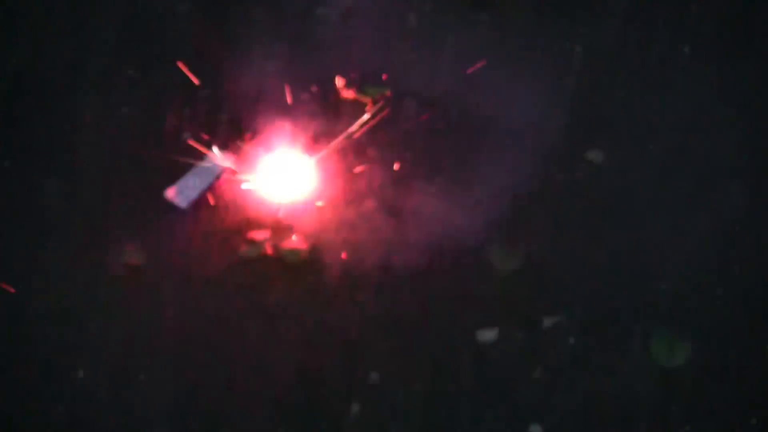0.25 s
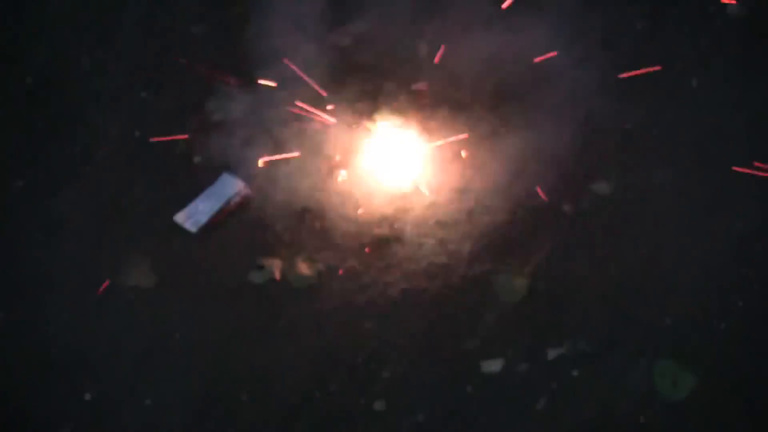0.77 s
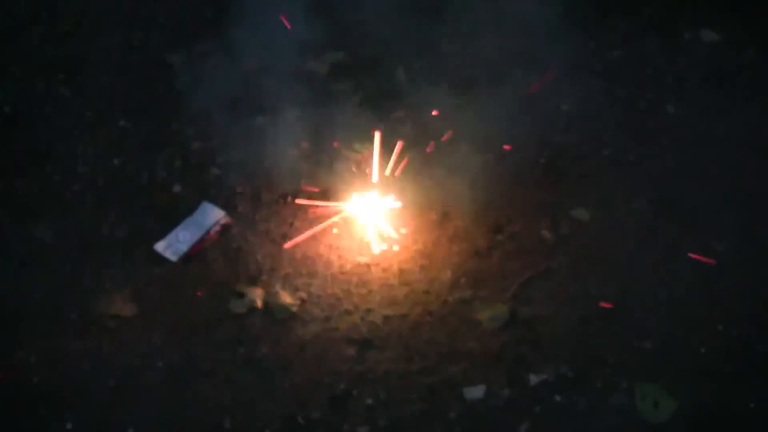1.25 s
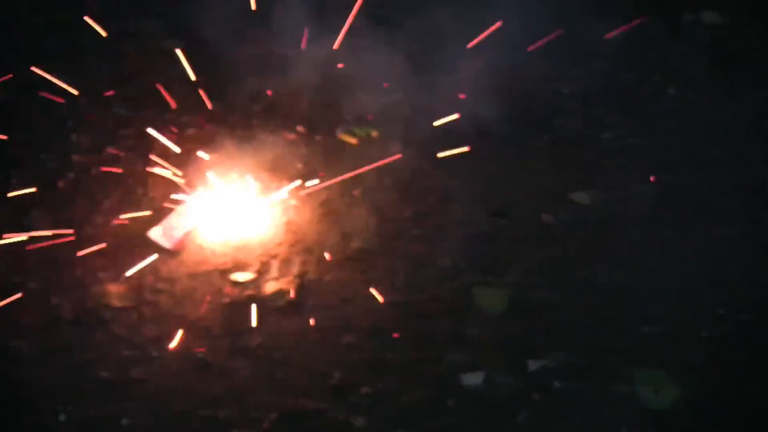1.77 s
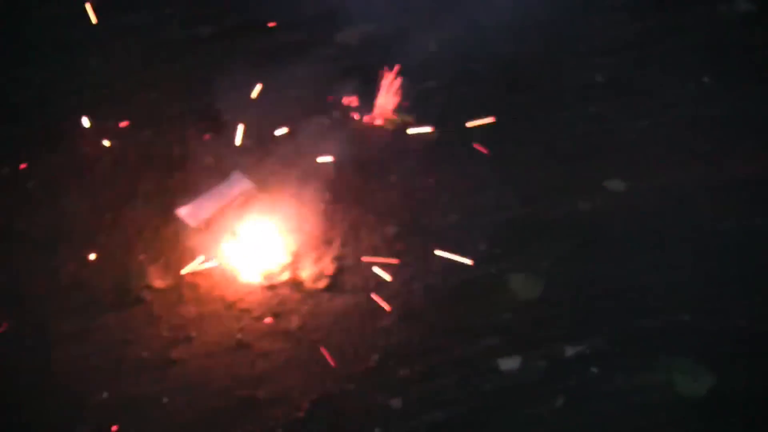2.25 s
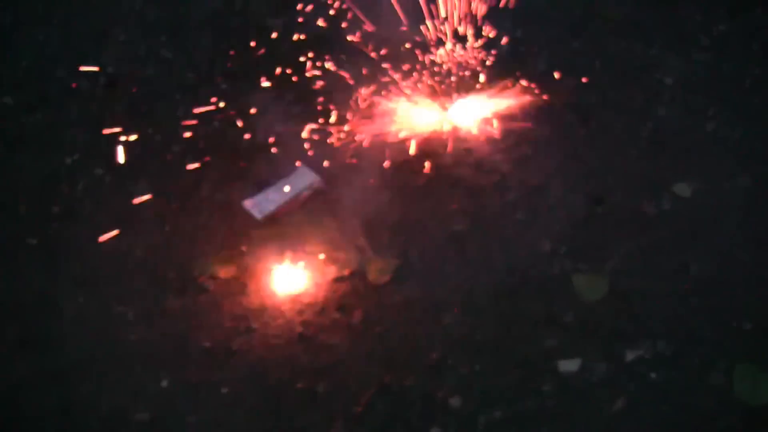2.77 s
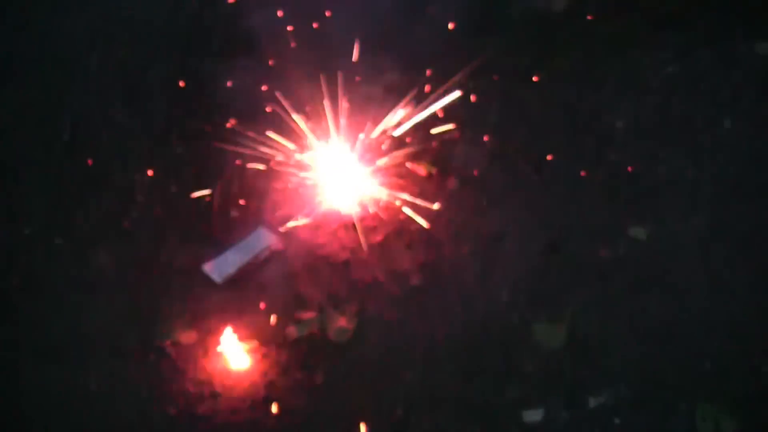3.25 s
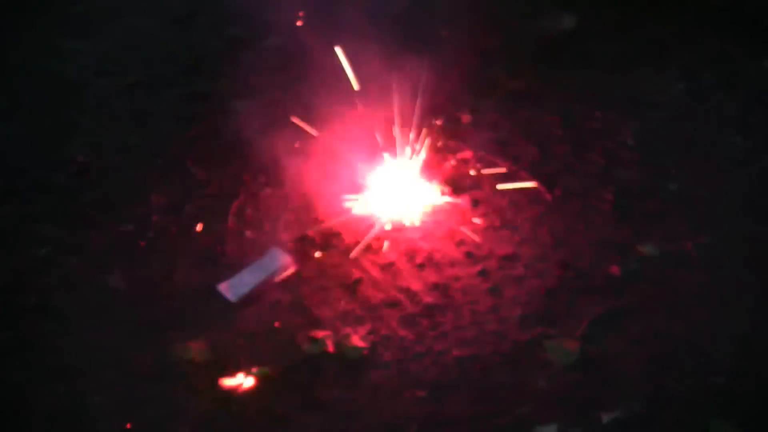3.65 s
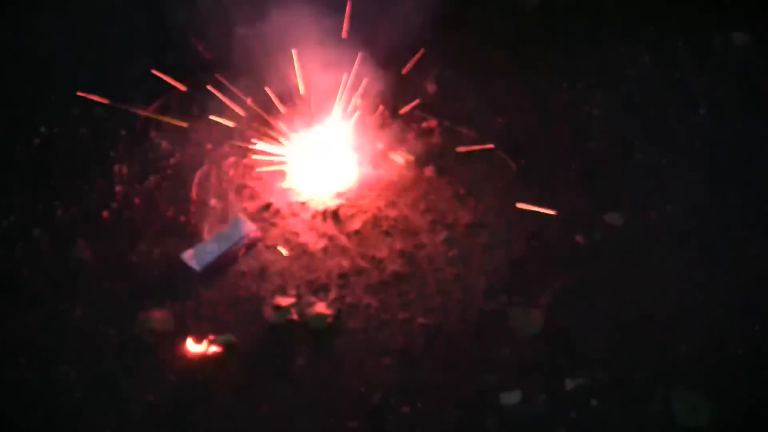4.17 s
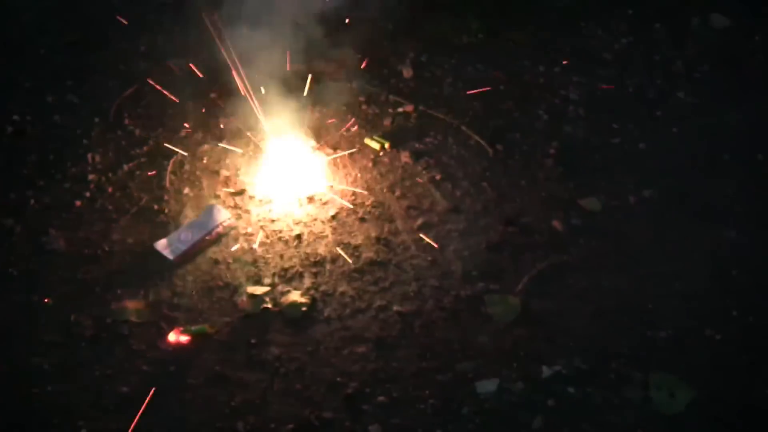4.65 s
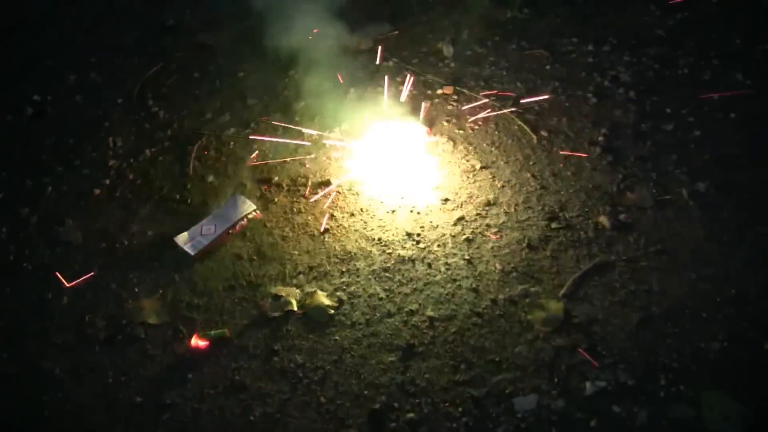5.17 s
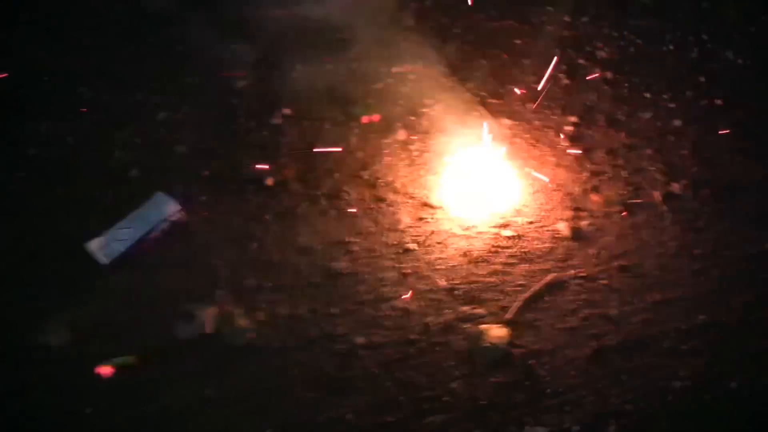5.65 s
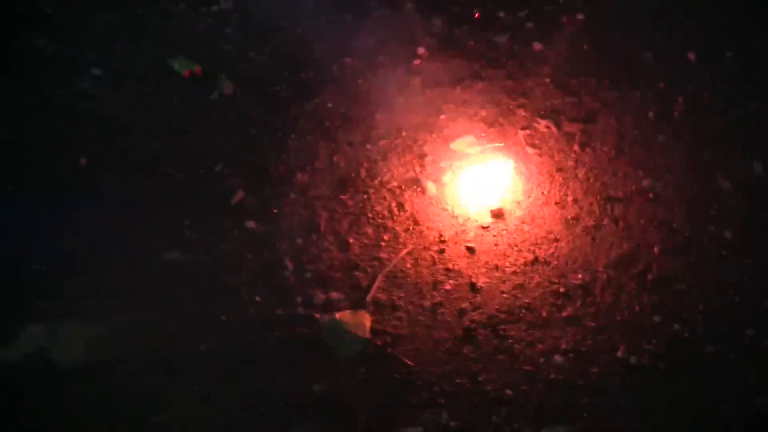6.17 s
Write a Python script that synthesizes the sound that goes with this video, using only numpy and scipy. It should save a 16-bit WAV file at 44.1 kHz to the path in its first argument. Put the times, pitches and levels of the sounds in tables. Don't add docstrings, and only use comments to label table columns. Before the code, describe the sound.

Two ground spinner fireworks burn in turn on gravel, a harsh crackling hiss and roar with buzzing hum, knocks and sharp pops.

```python
import sys
import numpy as np
from scipy import signal
from scipy.fft import rfft, irfft
from scipy.io import wavfile
from scipy.ndimage import uniform_filter1d

SR = 44100
rng = np.random.default_rng(int(sys.argv[2]) if len(sys.argv) > 2 else 0)


def field_ratio(decibels):
    return 10 ** (np.asarray(decibels, dtype=float) / 20)


def inscribe(sig):
    pcm = np.round(np.clip(np.atleast_2d(sig).T, -1, 1) * 32767)
    wavfile.write(sys.argv[1], SR, pcm.astype(np.int16))


N = 282813
T = np.arange(N) / SR
F = np.fft.rfftfreq(N, 1 / SR) + 1

TIRED_FROM_S, FIRST_END_S = 1.93, 2.82
# start_s, peak_db
TIRED_KNOCKS = [(1.959, -24), (1.97, -28), (1.985, -25), (1.998, -22), (2.012, -22), (2.027, -17),
                (2.04, -16), (2.055, -17), (2.073, -22), (2.094, -30), (2.113, -25), (2.13, -27),
                (2.139, -32), (2.147, -32), (2.166, -28), (2.182, -21), (2.2, -24), (2.214, -18),
                (2.231, -16), (2.247, -17), (2.266, -21), (2.291, -26), (2.312, -25), (2.333, -30),
                (2.355, -28), (2.375, -20), (2.393, -22), (2.412, -18), (2.434, -17), (2.455, -19),
                (2.465, -22), (2.471, -28), (2.483, -24), (2.489, -24), (2.5, -31), (2.508, -20),
                (2.516, -21), (2.532, -21), (2.54, -21), (2.561, -20), (2.582, -19), (2.596, -28),
                (2.605, -20), (2.614, -20), (2.629, -19), (2.651, -20), (2.66, -25), (2.669, -30),
                (2.676, -19), (2.684, -22), (2.696, -24), (2.713, -27), (2.719, -25), (2.728, -21),
                (2.75, -24), (2.767, -28)]
# start_s, peak_db
EARLY_KNOCKS = [(2.785, -25), (2.839, -21), (2.855, -24), (2.874, -20), (2.89, -21), (2.9, -20),
                (2.918, -20), (2.934, -23), (2.944, -24), (2.961, -23), (2.977, -22), (2.99, -25),
                (3.0, -21), (3.013, -21), (3.025, -22), (3.042, -24), (3.057, -21), (3.084, -21),
                (3.093, -26), (3.107, -27), (3.135, -22), (3.162, -23), (3.177, -22), (3.191, -22),
                (3.221, -25), (3.272, -23), (3.28, -26), (3.301, -25), (3.312, -27), (3.499, -23),
                (3.509, -27), (3.549, -27), (3.745, -26), (3.755, -23), (3.885, -26), (3.894, -24),
                (3.915, -26), (4.152, -22), (4.233, -25), (4.242, -24), (4.269, -25), (4.456, -23),
                (4.465, -20), (4.473, -22), (4.493, -26), (4.599, -22), (4.607, -25), (4.628, -23),
                (4.705, -23), (4.713, -24), (4.743, -23), (4.763, -24), (4.86, -23), (4.878, -21),
                (4.888, -26)]
# start_s, peak_db
SLOW_KNOCKS = [(4.899, -29), (4.907, -22), (4.938, -25), (4.948, -28), (4.967, -23), (4.977, -18),
               (4.99, -23), (4.998, -28), (5.062, -25), (5.095, -26), (5.117, -25), (5.14, -19),
               (5.357, -28), (5.566, -24), (5.612, -21), (5.626, -20), (5.642, -19), (5.66, -18),
               (5.679, -25), (5.717, -26), (5.736, -25), (5.754, -25), (5.809, -25), (5.848, -24),
               (5.901, -29), (5.916, -23), (5.958, -26), (6.023, -27), (6.033, -19), (6.055, -24),
               (6.064, -27), (6.075, -26), (6.083, -21), (6.095, -28), (6.102, -25), (6.112, -28),
               (6.137, -26), (6.172, -26), (6.179, -26), (6.192, -17), (6.199, -21), (6.216, -18),
               (6.227, -17), (6.247, -19), (6.256, -23), (6.269, -29), (6.29, -17), (6.313, -24),
               (6.331, -17), (6.339, -25), (6.345, -24), (6.354, -23), (6.366, -25), (6.383, -27),
               (6.392, -25), (6.401, -25)]


def columns(table):
    s, *rest = np.transpose(table)
    return [np.interp(T, s, c) for c in rest]


def unit(x):
    return x / np.sqrt(np.mean(x ** 2))


def walk(rate):
    hold = max(int(SR / rate), 1)
    steps = np.repeat(rng.standard_normal(N // hold + 1), hold)
    w = uniform_filter1d(uniform_filter1d(steps, hold), hold)[:N]
    return w / w.std()


def spans(starts, lengths, values, edge_s):
    out = sum(v * ((T >= s) & (T < s + d)) for s, d, v in zip(starts, lengths, values))
    return uniform_filter1d(out, max(int(edge_s * SR), 1))


def colour(table):
    hz, db = np.transpose(table)
    return field_ratio(np.interp(np.log(F), np.log(hz), db))


def flame(ground_db):
    # start_s, level_db, pressure, sparkle
    burn = [(0, -30, 1.03, 0.47), (.66, -26.5, 0.72, 0.24), (.7, -31.5, 1.1, 0.58), (1.23, -30, 0.87, 0.5),
            (1.36, -28, 1, 0.62), (1.9, -28.5, 0.5, 0.44), (2.66, -25, 0, 0.31), (2.8, -25.5, 0.5, 0.27),
            (3.1, -26.5, 0.27, -0.2), (3.25, -27.5, 0.66, 0.012), (3.52, -28, 0.89, -0.053),
            (3.68, -28, 1.16, 0.41), (4.4, -28.5, 0.92, 0.41), (5.2, -28, 0.43, 0.78),
            (5.5, -28.5, 0.56, 0.8), (5.9, -30, 0.04, 0.63), (6.1, -28.5, -0.8, 0.42),
            (6.41, -29.5, -3, 0.22)]
    # middle_s, length_s, change_db
    flares = [(0.14, 0.036, 2), (0.823, 0.12, -2.5), (1.283, 0.03, 3), (1.427, 0.037, 2.5),
              (1.496, 0.039, -1), (1.57, 0.058, 1.5), (1.929, 0.045, -1), (2.122, 0.057, 1.5),
              (2.74, 0.061, 1), (3.14, 0.028, 5), (3.772, 0.047, 2), (3.89, 0.057, 1), (4.473, 0.043, 0),
              (4.98, .03, 1), (5.007, 0.051, -3.5), (5.225, 0.12, 0.5), (5.124, 0.016, -6),
              (5.177, 0.028, 1.5), (5.438, 0.061, -2), (5.711, 0.025, 4), (6.081, 0.026, 4.5),
              (6.13, 0.047, -2), (6.227, 0.032, 2.5), (6.273, .03, -3), (6.335, 0.042, -6.5),
              (6.352, .015, -1)]
    # middle_s, length_s, change_db
    lulls = [(.45, .1, -2), (0.721, 0.091, -1), (0.948, 0.095, 2), (1.374, 0.1, -1), (1.71, .09, -1.5),
             (2.138, .05, -2), (2.33, .06, -2.5), (2.553, 0.35, -0.5), (2.78, 0.069, -1), (3.001, 0.36, 2),
             (3.638, 0.12, -1.5), (4.405, 0.1, -2), (4.6, 0.33, 0.5), (5.244, 0.16, -5.5),
             (5.42, 0.11, -3.5), (5.68, 0.23, 2.5), (5.994, .05, 1), (6.093, 0.16, 1.5), (6.27, 0.13, 0),
             (6.36, .04, -3)]
    level_db, pressure, sparkle = columns(burn)
    middle, length, db = np.transpose(flares)
    flare_db = spans(middle - length / 2, length, db, 0.03)
    middle, length, db = np.transpose(lulls)
    gravel_db = ground_db + spans(middle - length / 2, length, db, 0.063)
    hiss_db = level_db - 0.96 + 0.066 * pressure + 12.4 * sparkle + flare_db
    roar_db = level_db - 0.12 - 3.5 * pressure + 0.089 * sparkle + 0.25 * flare_db + gravel_db
    rush_db = level_db - 2.9 - 1.74 * pressure + 8.66 * sparkle + 0.25 * flare_db + 0.39 * gravel_db
    fizz_db = level_db + 0.089 + 5.97 * pressure + 0.1 * sparkle + 0.84 * flare_db
    return hiss_db, roar_db, rush_db, fizz_db


def gas(beat, spark_db, fast_db, slow_db):
    sizes_db = np.minimum(4.0 * rng.exponential(size=N), 13)
    struck = rng.random(N) < 1500 / SR
    sparks = struck * field_ratio(sizes_db) * np.sign(rng.standard_normal(N))
    noise = rng.standard_normal((2, N)) * field_ratio(fast_db * walk(220) + slow_db * walk(45))
    noise[0] += field_ratio(spark_db) * unit(sparks)
    return rfft(noise * beat)


def jets(beat, ground_db):
    # pitch_hz, level_db
    roar_points = [(30, -8), (60, -17), (94, -2.5), (126, -3.5), (232, -1.5), (389, -15), (513, -10.5),
                   (757, -10.5), (911, -16.5), (1140, -10.5), (2020, -3.5), (2170, -2), (2470, 0),
                   (5000, -3), (6500, -12), (11000, -120)]
    # pitch_hz, level_db
    hiss_points = [(1470, -23), (2500, -0.5), (3610, 1.5), (5380, 3.5), (6270, 3), (8070, -5.5),
                   (9200, -2.5), (10800, -1.5), (12400, -6.5), (14700, -5), (15600, -8.5)]
    crossings = (450, 1250, 4150, 8200, 11600)
    roar_tint, hiss_tint = colour(roar_points), colour(hiss_points)
    hiss_db, roar_db, rush_db, fizz_db = flame(ground_db)
    coarse = np.clip((roar_db - hiss_db + 10) / 12, 0, 1)
    roar = roar_tint * gas(beat ** (0.69 + 0.18 * coarse), spark_db=-5.5 + 2.4 * coarse,
                           fast_db=1.36 + 0.63 * coarse, slow_db=0.5)
    rush = roar_tint * gas(beat ** (1.0 + 0.2 * coarse), spark_db=-5 + 2.0 * coarse, fast_db=2.0, slow_db=0.7)
    rush = 0.57 * roar + rush
    beat = np.roll(beat, int(0.0023 * SR))
    hiss = hiss_tint * gas(beat ** 0.5, spark_db=-1.0, fast_db=1.77, slow_db=-0.15)
    fizz = 0.28 * hiss + hiss_tint * gas(beat ** 0.83, spark_db=-4, fast_db=2.3, slow_db=0.3)
    crest = 0.9 * fizz + hiss_tint * gas(beat ** 0.8, spark_db=-4, fast_db=2.2, slow_db=0.2)

    rumble_db = np.minimum(roar_db, -29.5) - 11.5
    levels = (rumble_db, roar_db - 3.5, rush_db - 0.8, hiss_db - 0.3, fizz_db - 2.5, fizz_db - 5.5)
    parts = (roar, roar, rush, hiss, fizz, crest)
    edges = (0, *crossings, SR)
    direct, diffuse = 0, 0
    for lo, hi, db, (near, around) in zip(edges, edges[1:], levels, parts):
        weight = 1 / np.sqrt((1 + (lo / F) ** 8) * (1 + (F / hi) ** 8))
        gain = field_ratio(db + 0.2 * walk(15) + 1.3 * walk(140))
        direct = direct + gain * unit(irfft(near * weight, N))
        if hi > crossings[2]:
            diffuse = diffuse + gain * unit(irfft(around * weight, N))
    return direct, diffuse


def first_motion():
    # start_s, turns_hz
    free_speed = [
        (0, 97.9),
        (.13, 129.7),
        (.5, 128.4),
        (1.0, 139.8),
        (1.45, 128.2),
        (1.63, 115),
        (1.8, 101.4),
        (1.95, 76),
        (2.3, 56.15),
        (2.85, 42),
    ]
    # start_s, length_s, thump_db, share of speed lost (0-1)
    scrapes = [(0, 0.15, -36.5, 0.08), (0.132, 0.064, -33.5, 0.25), (0.201, 0.05, -34.5, 0.07),
               (0.252, 0.12, -33.5, 0.25), (0.358, 0.047, -36, 0.43), (0.532, 0.074, -32, 0.3),
               (0.797, 0.068, -34, 0.41), (1.033, 0.075, -30.5, 0.41), (1.112, 0.085, -35.5, 0.31),
               (1.199, 0.055, -29.5, 0.37), (1.348, 0.076, -43.5, 0.01), (1.468, 0.06, -34, 0.42),
               (1.66, 0.12, -32.5, 0.26), (1.768, 0.11, -35.5, 0.25), (1.907, 0.11, -45, 0.09),
               (2.02, 0.073, -31.5, 0), (2.102, 0.093, -27, 0.06), (2.207, 0.06, -31.5, 0.1),
               (2.287, 0.087, -48, 0.01), (2.382, 0.088, -31.5, 0.1), (2.48, 0.19, -30, 0.12),
               (2.676, 0.13, -36, 0.14)]
    start, length, db, lost = np.transpose(scrapes)
    lag = np.exp(-1 / (0.035 * SR))
    drag = signal.lfilter([1 - lag], [1, -lag], spans(start, length, lost, 0))
    thump = spans(start, length, field_ratio(db), 0.032) + field_ratio(-69)
    contact = np.minimum(thump / field_ratio(-33.5), 1.2)
    return columns(free_speed)[0] * (1 - drag), 20 * np.log10(thump), contact


def turning(hz, wobble=0.006):
    return np.cumsum(hz * (1 + wobble * walk(40))) / SR


def thud(pulses, shift=1):
    # pitch_hz, width_hz, level_db
    modes = [
        (203, 286, 5),
        (557, 410, -3.5),
        (1450, 4500, -19),
        (95, 99, -5.5),
    ]
    push = signal.lfilter(*signal.butter(2, 1200, fs=SR), pulses)
    out = 0
    for i, (hz, width, db) in enumerate(modes):
        peak = signal.iirpeak(shift * hz, hz / width, SR)
        ring = signal.lfilter(*peak, push)
        if i == 0:
            ring = signal.lfilter(*peak, ring)
        out = out + field_ratio(db) * ring
    return out


def first_body(turns, hz, thump_db, alive):
    late = 0.013 * (100 / hz) ** 2 * walk(130)
    landed = np.maximum.accumulate(np.floor(turns + late))
    pulses = np.diff(landed, prepend=0) * field_ratio(1.8 * walk(110))
    grit = signal.lfilter([1], [1, -0.99], pulses) * rng.standard_normal(N)
    blows = thud(pulses + 0.05 * grit)
    blows = blows / np.sqrt(uniform_filter1d(blows ** 2, SR // 10) + 1e-12)
    touch = field_ratio(thump_db + 6.5 + 0.67 * np.minimum(thump_db + 34.5, 0))
    hum = field_ratio(-43.5 + 8 * np.log10(hz / 125)) * np.sin(2 * np.pi * turns)
    rock = field_ratio(-44.5) * np.clip((T - 2.25) / 0.12, 0, 1) * np.sin(4 * np.pi * turns)
    return alive * (touch * blows * (T < TIRED_FROM_S) + hum + rock)


def spits():
    # start_s, peak_db, pitch_hz
    lumps = [(0.306, -2.5, 1210), (0.142, -9, 3000), (0.391, -8, 5000), (0.567, -10, 2500),
             (0.676, -1, 4500), (0.817, -9, 1200), (0.366, -0.5, 1820), (1.064, -1, 1999),
             (1.778, -1, 1510), (1.807, 0, 3480), (2.131, -3, 2710), (2.219, 1, 2984), (2.291, -20, 2163),
             (2.315, -16, 1170), (2.336, -14, 2250), (2.466, -24, 773), (2.489, -1, 2513),
             (2.564, -1, 1482), (3.085, -3, 730), (3.068, -3, 1400), (2.892, -2, 1200), (3.002, -9, 710),
             (2.853, -1, 2060), (2.871, -11, 1390), (2.92, -8, 750), (2.976, -24, 710), (3.192, -5, 1480),
             (4.323, -4.5, 2420), (4.496, -3, 2457), (4.712, -3.5, 3260), (4.879, -4, 2510),
             (4.978, -3, 2520), (5.242, 0, 3190), (5.919, -22, 2867), (6.03, -8, 2370), (6.087, 2.5, 1990),
             (6.227, -23, 1830), (6.288, -24, 2323), (6.322, -7, 1333), (6.394, -13, 1310)]
    out, t = np.zeros(N), T[:SR // 80]
    for (s, db, hz), noise in zip(lumps, rng.standard_normal((len(lumps), len(t)))):
        crack = signal.lfilter(*signal.iirpeak(hz, 1.8, SR), noise * np.exp(-t / 0.0014))
        at = int(s * SR)
        out[at:at + len(t)] += field_ratio(db - 5.5) * crack / abs(crack).max()
    return out


def puffs():
    s, db = np.transpose(TIRED_KNOCKS + EARLY_KNOCKS + SLOW_KNOCKS)
    return spans(s, s * 0 + 0.008, np.minimum(field_ratio(db + 23.0), 1.5), 0.0026)


def knocks():
    out, blow = np.zeros(N), np.arange(SR // 25) == 0
    hits = TIRED_KNOCKS + EARLY_KNOCKS + SLOW_KNOCKS
    for (s, db), spread in zip(hits, rng.standard_normal((len(hits), 1))):
        ring = thud(blow, 1.1 + 0.1 * spread[0])
        peak_db = -18.5 + 1.3 * (s < FIRST_END_S) + 1.14 * (db + 22.5)
        at = int(s * SR)
        out[at:at + len(ring)] += (field_ratio(peak_db) * ring / abs(ring).max())[:N - at]
    return out


def second_body(turns, hum_db, alive):
    octave = field_ratio(-9.5 + 3 * walk(20)) * np.sin(4 * np.pi * turns)
    hum = np.sin(2 * np.pi * turns) + octave
    return alive * np.sqrt(2) * field_ratio(hum_db + 9.5 + 0.9 * walk(24.9)) * hum


def ports(mid, around):
    # pitch_hz, half_width_hz, phase_rad
    resonances = [
        (7260, 1480, 2.53),
        (10130, 1800, -0.7),
        (12200, 1100, -0.44),
        (13800, 440, 0.3),
    ]
    # on_aim_db, slope_db per aim, bend_db per aim squared
    differences = [
        (-3.5, -5, 6),
        (-3.5, 5.5, -19.5),
        (-3, 16, -19),
        (-9.5, 27.5, -12),
    ]
    # start_s, aim off the flame (0-1)
    swing = [(0, .55), (.32, 0.4), (.64, 0.26), (1.0, 0.83), (1.28, 0.73), (1.6, 0.3), (1.92, 0.09),
             (2.3, 0.05), (2.56, 0.48), (2.88, 0.73), (3.3, 0.4), (3.55, 0.45), (3.84, 0.72), (4.16, 0.4),
             (4.5, 0.28), (4.8, 0.2), (5.12, 0.44), (5.44, 0.85), (5.8, 1)]
    heard = rfft(0.49 * mid + 0.57 * around)
    side, aim = 0, columns(swing)[0]
    for (hz, width, phase), (on, slope, bend) in zip(resonances, differences):
        ring = np.exp(1j * phase) / (1 + 1j * (F - hz) / width) ** 2
        side = side + field_ratio(on + slope * aim + bend * aim ** 2 + 2.0) * irfft(ring * heard, N)
    return np.array([mid + side, mid - side])


def scene():
    # start_s, turns_hz, hum_db
    second_motion = [(2.6, 21, -71), (2.9, 43.56, -66), (3.24, 108.1, -55), (3.41, 126.6, -52),
                     (3.56, 121.8, -52.5), (3.87, 127.6, -54), (4.11, 144.3, -49.5), (4.38, 144.2, -55),
                     (4.87, 135.1, -51), (5.08, 120, -57), (5.25, 99.9, -67), (5.45, 93.3, -71),
                     (5.6, 65.2, -58), (5.92, 45.05, -63), (6.21, 39.57, -91), (6.41, 29.1, -73)]
    hz1, thump_db, contact = first_motion()
    hz2, hum2_db = columns(second_motion)
    turns1, turns2 = turning(hz1), turning(hz2, wobble=0.012)

    beat1 = np.exp(0.44 * np.cos(2 * np.pi * (turns1 - 0.05)))
    beat2 = np.exp(0.37 * np.clip(hz2 / 70, 0.4, 1) * np.cos(2 * np.pi * turns2))
    share = np.clip((T - 2.61) / 0.7 + 0.5, 0, 1)
    beat = np.sqrt((1 - share) * beat1 ** 2 + share * beat2 ** 2)
    beat = beat / np.sqrt(uniform_filter1d(beat ** 2, SR // 8))
    ground_db = 4.5 * contact * (T < TIRED_FROM_S) + 2 * puffs()
    jet, around = jets(beat, ground_db)

    first_alive = np.clip((FIRST_END_S - T) / 0.16, 0, 1)
    second_alive = np.clip((T - 3.1) / 0.18, 0, 1)
    bodies = first_body(turns1, hz1, thump_db, first_alive) + second_body(turns2, hum2_db, second_alive)

    choke = np.where((T > 6.367) & (T < 6.393), field_ratio(-12), 1)
    choke = uniform_filter1d(choke, size=200)
    choke = choke * np.interp(T, [6.398, 6.41], [1, 0.55])
    return ports(choke * jet + bodies + knocks() + spits(), choke * around)


def fold_narrow(x, under_db):
    mid, side = signal.stft([x[0] + x[1], x[0] - x[1]], nperseg=2048)[2] / 2
    bands = np.arange(0, len(mid), 8)
    side_power = np.add.reduceat(abs(side) ** 2, bands)
    mid_power = np.add.reduceat(abs(mid) ** 2, bands)
    wide = side_power > field_ratio(2 * under_db) * mid_power
    side = signal.istft(side * np.repeat(wide, 8, axis=0)[:len(mid)], nperseg=2048)[1][:N]
    return x.mean(axis=0) + np.array([side, -side])


def top_cut(x):
    return signal.sosfilt(signal.butter(12, 16020, fs=SR, output="sos"), x)


def record(dry):
    x = signal.sosfilt(signal.butter(2, 70, "high", fs=SR, output="sos"), dry)
    x = signal.sosfilt(signal.ellip(10, 0.2, 70, 15650, fs=SR, output="sos"), x)
    mix = fold_narrow(np.clip(x, -0.86, 0.86), under_db=-6.5)
    return top_cut(mix)


dry = scene()
out = record(dry)
inscribe(out)
```